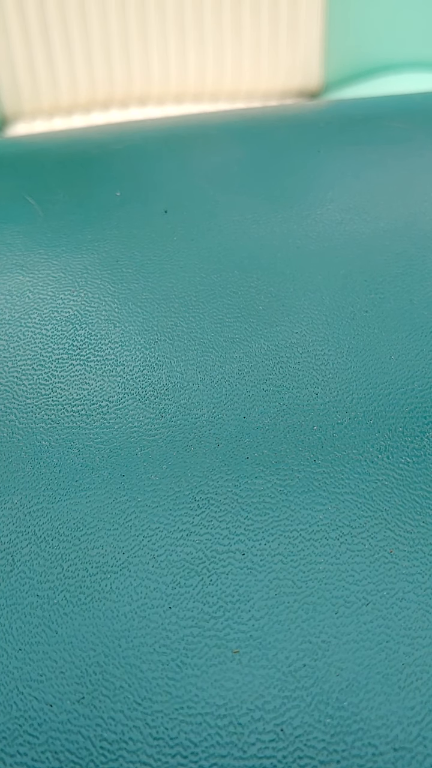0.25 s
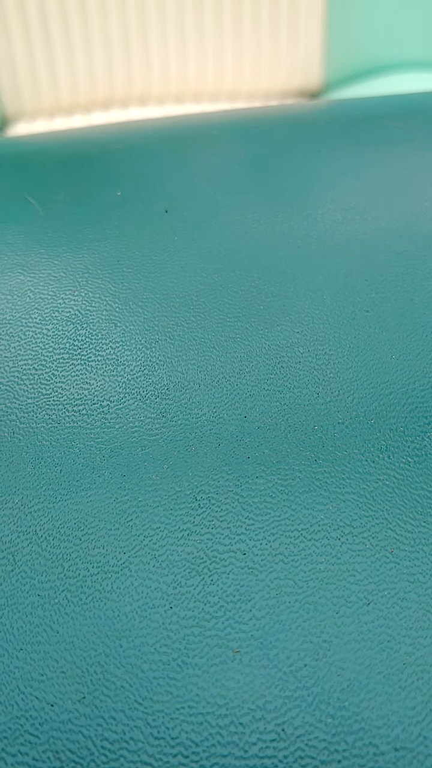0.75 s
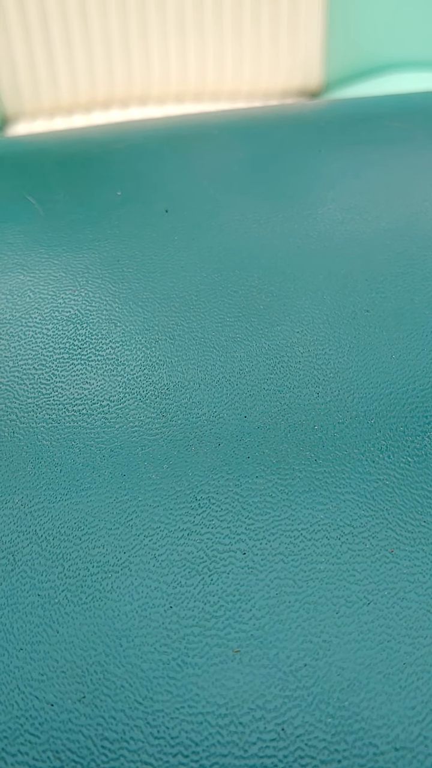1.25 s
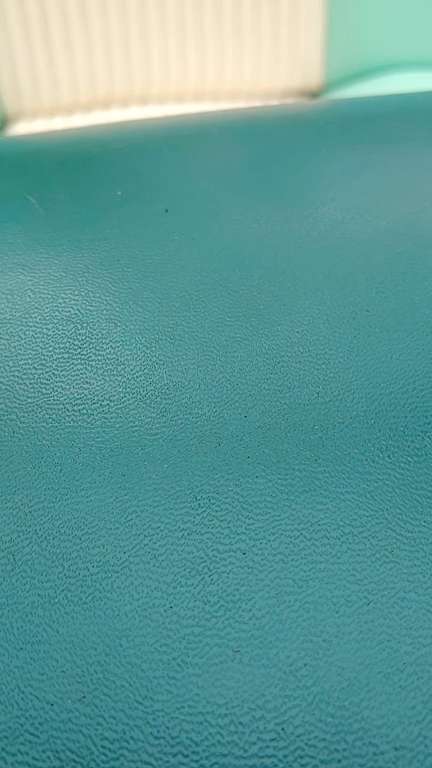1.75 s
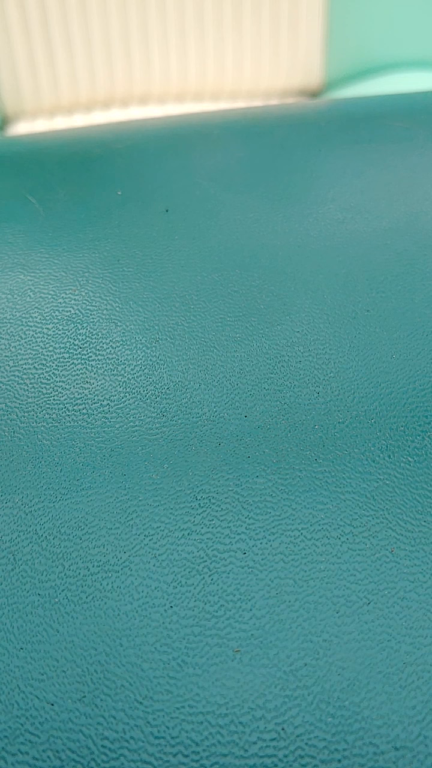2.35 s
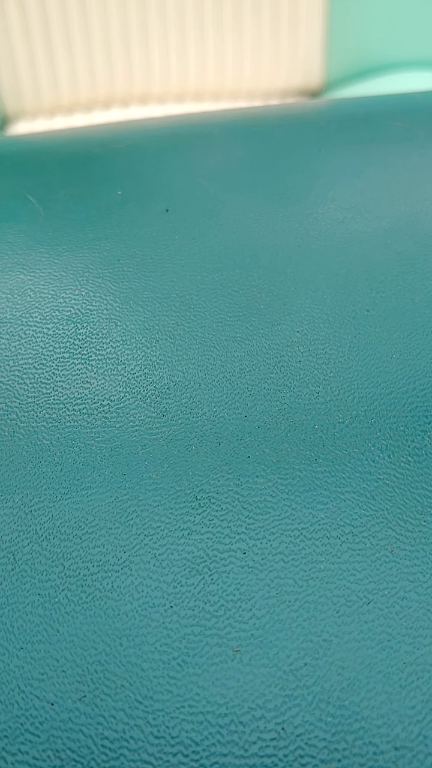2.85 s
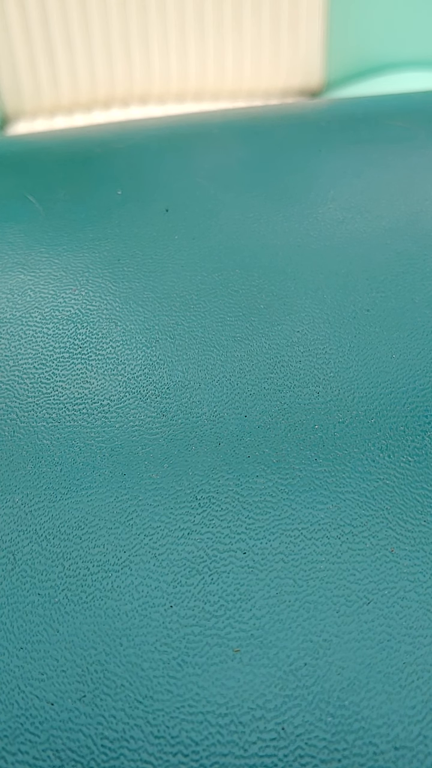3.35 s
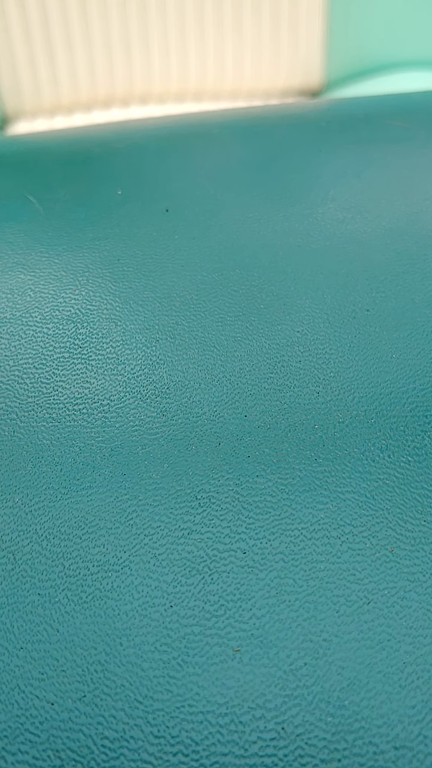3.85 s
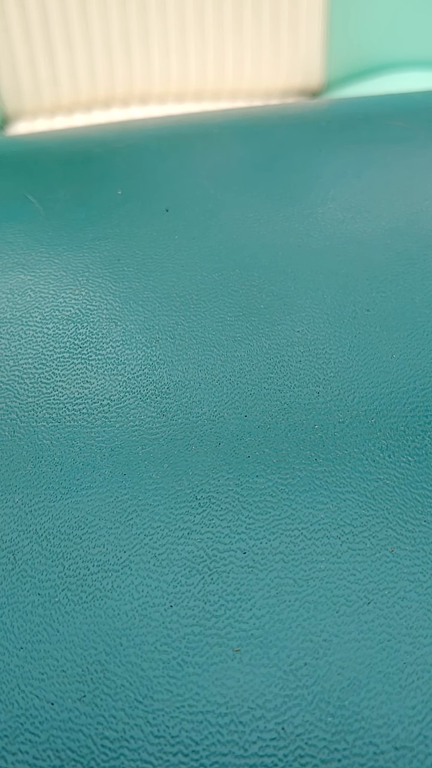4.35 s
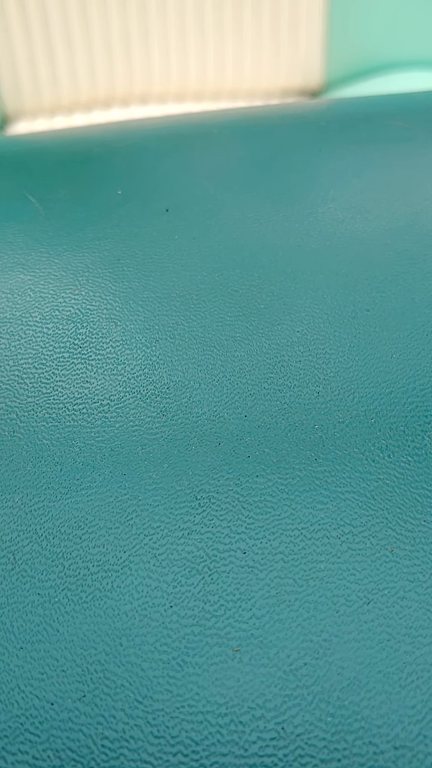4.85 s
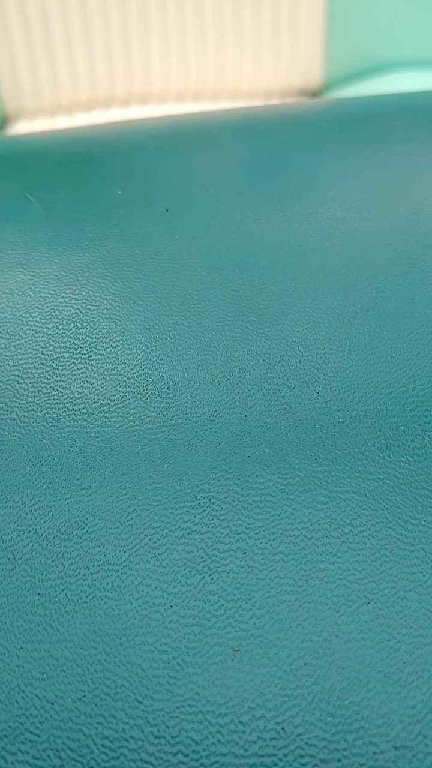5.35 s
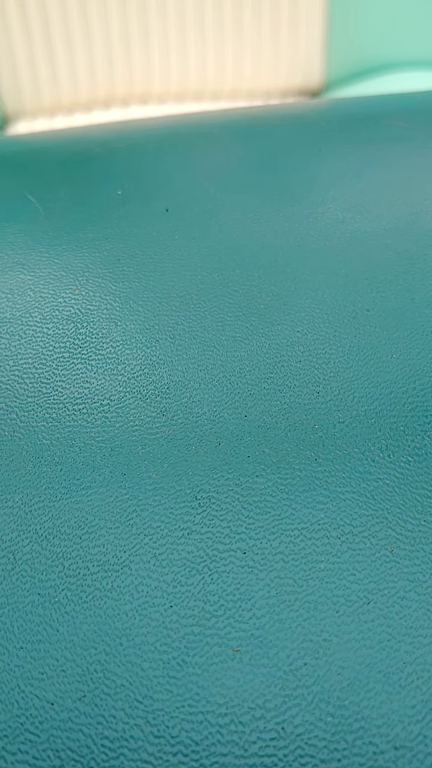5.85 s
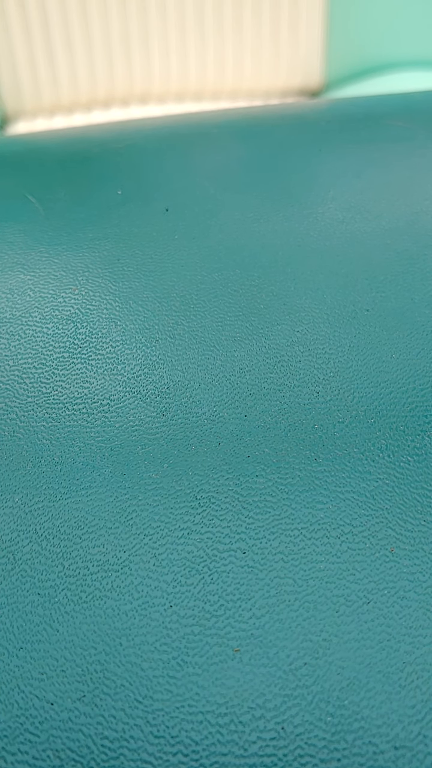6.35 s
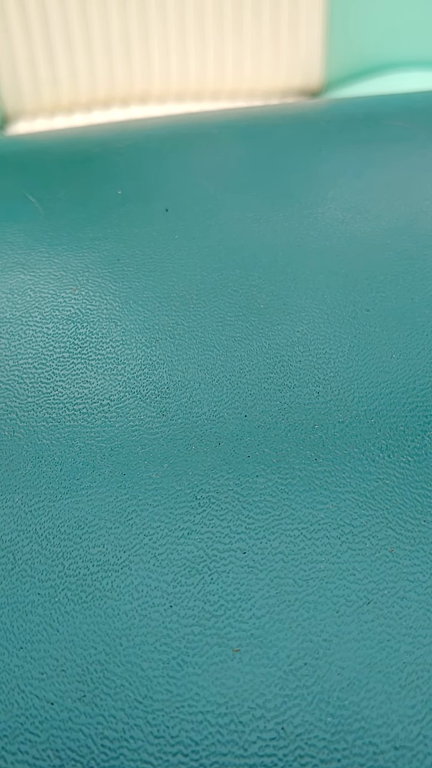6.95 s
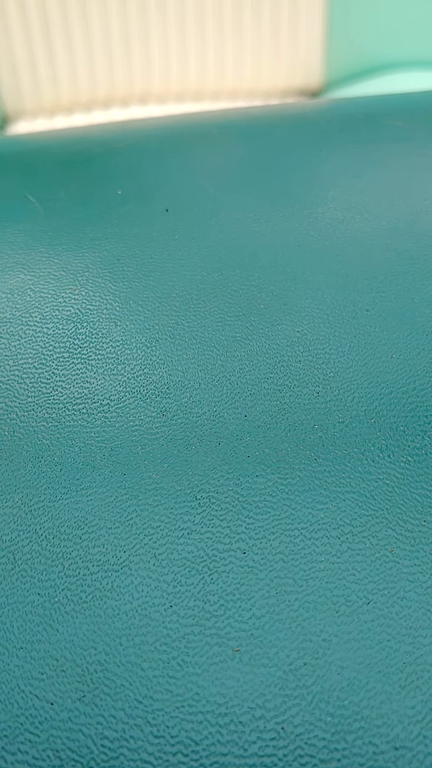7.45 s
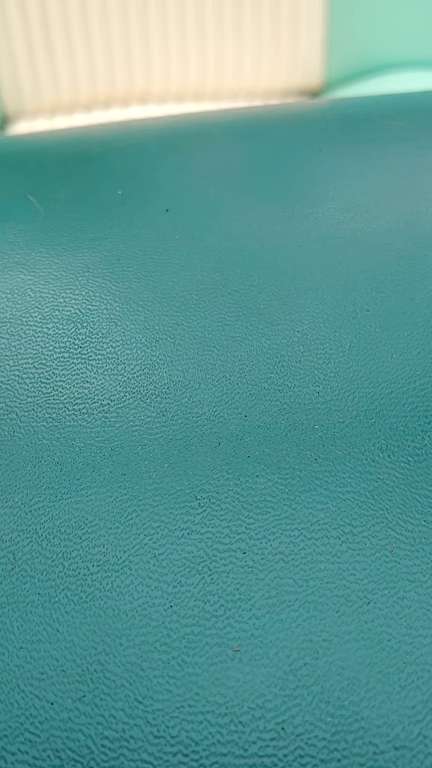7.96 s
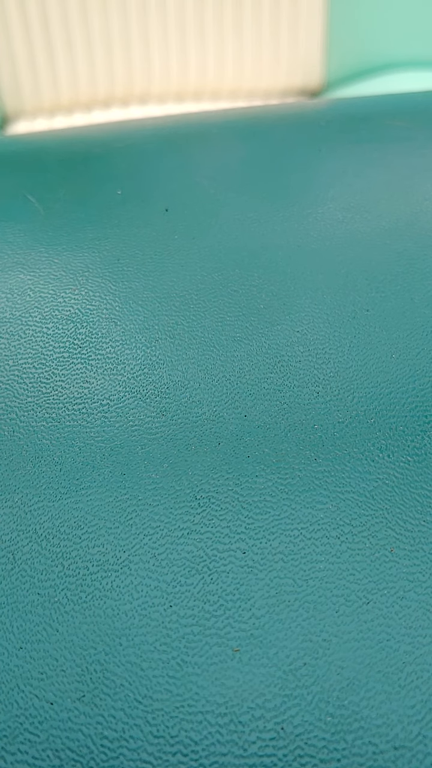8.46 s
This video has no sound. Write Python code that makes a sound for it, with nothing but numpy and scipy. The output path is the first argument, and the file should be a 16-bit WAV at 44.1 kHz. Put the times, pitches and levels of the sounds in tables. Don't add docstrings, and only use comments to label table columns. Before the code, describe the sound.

An old eight-cylinder engine idles steadily and a little lumpily up close, its valves ticking over a low hum and rushing fan air.

```python
import sys
import numpy as np
from scipy import signal
from scipy.fft import rfft, irfft, next_fast_len
from scipy.io import wavfile
from scipy.ndimage import uniform_filter1d

SR = 44100
rng = np.random.default_rng(int(sys.argv[2]) if len(sys.argv) > 2 else 0)


def int16_out(signal):
    q = np.round(np.clip(np.atleast_2d(signal).T, -1, 1) * 32767)
    wavfile.write(sys.argv[1], SR, q.astype(np.int16))


def voltage_ratio(level):
    return 10 ** (np.asarray(level, float) / 20)


N = 383669


def walk(rate_hz):
    hold = int(SR / rate_hz)
    steps = np.repeat(rng.standard_normal(N // hold + 1), hold)
    return 1.27 * uniform_filter1d(uniform_filter1d(steps, hold), hold)[:N]


def read_curve(rows, hz):
    row_hz, value = np.array(rows)[:, :2].T
    return np.interp(np.log(hz + 1), np.log(row_hz), value)


def spectrum_grid():
    size = next_fast_len(N)
    return size, np.arange(size // 2 + 1) * SR / size


def port_gains(db):
    return np.sqrt(2) * voltage_ratio(np.array(db))[:, None]


IDLE_TURNS_PER_S = 6.78
# time_s [s], lead_turns [camshaft turns]
HUNT = [(0, -.04), (.2, -.04), (.45, -.068), (.95, -.088), (1.4, -.136), (1.95, -.142), (2.35, -.123),
        (2.7, -.152), (3.2, -.145), (3.6, -.162), (4.45, -.136), (5.5, -.106), (5.95, -.106), (6.4, -.076),
        (7.2, -.077), (8.2, -.088), (8.7, -.107)]


def camshaft():
    time_s, lead_turns = np.transpose(HUNT)
    return time_s, IDLE_TURNS_PER_S * time_s + lead_turns


# multiple [per cam turn], left_db [dB], right_db [dB]
HUM = [(4, -48, -42), (8, -19, -21), (9, -33, -33), (10, -37, -37), (11, -29, -30), (13, -35, -40),
       (18, -36, -31), (20, -40, -41), (21, -45, -43), (24, -33, -31), (25, -40, -41), (26, -42, -43),
       (28, -40, -41), (31, -43, -40), (32, -32, -36), (40, -28, -36), (42, -32, -36), (56, -41, -40),
       (60, -42, -41), (62, -49, -49), (64, -54, -50), (76, -52, -49)]


def hum(cam_turns, lift_db, waver_db, slip):
    out = np.zeros((2, N))
    for multiple, *port_db in HUM:
        start_turns = rng.random() * (multiple % 8 > 0) + slip * walk(8) * multiple / 40
        tone = np.sin(2 * np.pi * (multiple * (cam_turns + 1 / 32) + start_turns))
        level = voltage_ratio(lift_db * multiple / 40 + waver_db * walk(8))
        out += port_gains(port_db) * level * tone
    return out


LIFTER_CLICKS, LIFTER_HZ, LIFTER_MS = 48, (700, 3500), (3, 8)
LIFTER_DB, LIFTER_DB_PER_OCTAVE = -25, -5
NEAR_BANK_DB, NEAR_BANK_TURNS = 2.5, .3


def lifters():
    click = np.arange(LIFTER_CLICKS)
    angle_turns = (click + .5) / LIFTER_CLICKS
    octaves = (click * .618 % 1) * np.log2(LIFTER_HZ[1] / LIFTER_HZ[0])
    ring_hz = LIFTER_HZ[0] * 2 ** octaves
    length_ms = LIFTER_MS[0] + (click * .414 % 1) * (LIFTER_MS[1] - LIFTER_MS[0])
    bank_db = NEAR_BANK_DB * octaves / 2 * np.cos(2 * np.pi * (angle_turns - NEAR_BANK_TURNS))
    right_db = LIFTER_DB + LIFTER_DB_PER_OCTAVE * octaves + bank_db
    return list(zip(angle_turns, ring_hz, length_ms, right_db))


# angle_turns [cam turns], ring_hz [Hz], length_ms [ms], right_db [dB]
TICKS = [(.017, 1680, 4, -24), (.023, 2280, 11, -29), (.063, 820, 5, -18), (.083, 1590, 7, -24),
         (.097, 1980, 3, -29), (.143, 900, 5, -24), (.17, 1980, 5, -28), (.203, 1080, 4, -27),
         (.263, 650, 3, -24), (.277, 2200, 8, -25), (.277, 2970, 9, -30), (.29, 900, 9, -26),
         (.29, 4010, 5, -29), (.317, 2110, 10, -23), (.343, 1510, 5, -26), (.383, 1850, 6, -26),
         (.463, 3700, 4, -30), (.477, 1980, 6, -19), (.53, 1640, 5, -22), (.57, 2110, 3, -27),
         (.583, 1590, 4, -27), (.65, 780, 6, -19), (.69, 820, 10, -22), (.743, 690, 4, -23),
         (.763, 860, 7, -24), (.817, 1680, 5, -25), (.883, 520, 4, -24), (.963, 1980, 4, -26),
         (.97, 1510, 3, -23), (.997, 820, 7, -21)]
# freq_hz [Hz], shade_db [dB]
TICK_SHADE = [(520, -2.5), (820, -6), (1080, -1), (1600, -7), (2100, -5), (2500, -2), (3000, -8),
              (4000, -8)]


def ticks(level_db, scatter_db, jitter_s, detune, apart_turns):
    time_s, turns = camshaft()
    t = np.arange(int(.04 * SR)) / SR
    out = np.zeros((2, N + len(t)))
    for angle_turns, ring_hz, length_ms, right_db in TICKS + lifters():
        port_db = right_db + read_curve(TICK_SHADE, ring_hz), right_db
        rise_s = length_ms / 1700
        shape = t / rise_s * np.exp(1 - t / rise_s)
        late, size, bend, start, skew = rng.standard_normal((60, 5)).T
        knock_s = np.interp(np.arange(60) + angle_turns, turns, time_s, right=-1)
        start_s = knock_s + jitter_s * late - 1.2 * rise_s
        extra_db = 12 / length_ms - length_ms / 6 + 1.8 * (ring_hz > 1450)
        gain = voltage_ratio(level_db + scatter_db * size + extra_db)
        for k in np.flatnonzero(start_s > 0):
            port_turns = np.array([[apart_turns * skew[k]], [0]])
            ring = np.sin(2 * np.pi * (ring_hz * (1 + detune * bend[k]) * t + start[k] + port_turns))
            i = int(start_s[k] * SR)
            out[:, i:i + len(t)] += gain[k] * port_gains(port_db) * shape * ring
    return out[:, :N]


# freq_hz [Hz], level_db [dB per Hz]
RUMBLE = [
    [(20, -63), (40, -53), (56, -49.5), (100, -42), (145, -52.5), (230, -49.5), (272, -41.5), (311, -45), (440, -55), (549, -51.5), (596, -52), (780, -48), (900, -60), (1145, -56.5)],
    [(20, -64), (40, -61), (56, -47), (105, -42), (150, -50), (237, -50.5), (283, -44.5), (325, -51.5), (366, -48.5), (454, -52.5), (589, -48), (780, -47), (960, -54.5), (1145, -60)],
]
# freq_hz [Hz], level_db [dB per Hz]
FAN = [
    [(1152, -57.7), (1342, -60), (1945, -55.5), (2718, -61.5), (2840, -68.5), (2996, -71), (3173, -67.5), (3335, -61), (3545, -72.5), (3993, -58), (4291, -59.5), (5498, -73), (5898, -67.5)],
    [(1152, -57.0), (1722, -48), (2074, -56), (2684, -64), (3437, -56.5), (3579, -55), (3742, -58.5), (3891, -55), (4312, -52.5), (4773, -54.5), (4956, -59), (5295, -58.5), (5898, -72)],
]
# freq_hz [Hz], level_db [dB per Hz]
HISS = [
    [(5905, -71.3), (6725, -71.5), (7410, -82.5), (8007, -86.5), (8691, -80), (9400, -97), (10305, -82.5), (11146, -86), (12298, -99)],
    [(5905, -71.0), (6569, -80.5), (7410, -89), (7702, -81.5), (8102, -88), (8705, -82.5), (9681, -94), (10502, -100), (12298, -110)],
]
# freq_hz [Hz], share [0-1]
ALIKE = [(40, 1), (120, 0.7), (180, 0.86), (260, 0.68), (600, 0.98), (1100, 0.66), (1950, 0.77),
         (2100, 0.6), (2650, 0.4), (3100, 0.35), (6000, 0.51), (9300, 0.04)]
# freq_hz [Hz], width_hz [Hz], peak_db [dB]
BAY = [(1860, 90, 2), (3020, 60, 3), (4220, 60, 2.5), (2230, 40, 4), (3310, 60, 5), (3520, 80, 4),
       (3920, 60, 4), (4380, 70, 4), (4750, 80, 3)]
# delay_ms [ms], share [signed ratio]
ECHOES = [
    [(2.9, 0.1), (4., 0.072), (6.5, 0.058), (10., 0.051)],
    [(5.4, 0.1), (6.5, .06), (10.2, 0.049), (11., 0.031)],
]
SAG_FROM_S, SAG_DB_PER_S = 8.17, -3


def rush_colour(hz):
    db = np.array([read_curve(low + mid[1:] + top[1:], hz) for low, mid, top in zip(RUMBLE, FAN, HISS)])
    metal_db = 0
    for freq_hz, width_hz, peak_db in BAY:
        metal_db = metal_db + peak_db / (1 + ((hz - freq_hz) / width_hz * 2) ** 2)
    return db + np.array([[.3], [1]]) * metal_db


def bay_echo(hz, port):
    bounce = sum(share * np.exp(-2j * np.pi * hz * delay_ms / 1000) for delay_ms, share in port)
    return 1 + bounce * (hz > 900)


def rush(cam_turns, swell_db, flicker_db, throb_db):
    size, hz = spectrum_grid()
    same, other = rfft(rng.standard_normal((2, size)))
    share = np.clip(read_curve(ALIKE, hz), 0, 1)
    air = np.array([same, share * same + np.sqrt(1 - share ** 2) * other])
    air = air * voltage_ratio(rush_colour(hz)) * np.sqrt(SR / 2)
    air = air * np.array([bay_echo(hz, port) for port in ECHOES])
    sag_db = SAG_DB_PER_S * np.clip(np.arange(N) / SR - SAG_FROM_S, 0, None)
    throb = throb_db * np.cos(2 * np.pi * (cam_turns - .42))
    swell = swell_db * walk(3)
    octave = np.clip(np.log2(hz / 20 + 1e-9), 0, 10)
    out = np.zeros((2, N))
    for k in range(11):
        band = np.clip(1 - np.abs(octave - k), 0, 1)
        part = irfft(air * band, size)[:, :N]
        upper_db = sag_db * (k > 6) + throb * ((k > 6) + 2 * (k == 7))
        out += part * voltage_ratio(swell + flicker_db * walk(12) + upper_db)
    return out


# multiple [per cam turn], left_db [dB], right_db [dB]
WHINES = [
    (81, -39, -36),
    (113, -36, -33),
    (121, -44, -40),
]


def whines(cam_turns, slip_hz, waver_db):
    out = np.zeros((2, N))
    for multiple, *port_db in WHINES:
        slip_turns = slip_hz * np.cumsum(walk(9)) / SR
        tone = np.sin(2 * np.pi * (multiple * cam_turns + slip_turns))
        out += port_gains(port_db) * voltage_ratio(waver_db * walk(16)) * tone
    return out


# freq_hz [Hz], lag_ms [ms]
LAG = [(60, .2), (300, .4), (1900, .452), (2060, .4), (2200, .27), (2600, .33), (3500, .295), (5000, .287)]


def delay_left(x):
    size, hz = spectrum_grid()
    turn_back = np.exp(-2j * np.pi * hz * read_curve(LAG, hz) / 1000)
    return irfft(rfft(x, size) * turn_back, size)[:N]


def scene():
    cam_turns = np.interp(np.arange(N) / SR, *camshaft())
    out = hum(cam_turns, lift_db=2.5, waver_db=1.8, slip=.04)
    out += ticks(level_db=-2, scatter_db=.7, jitter_s=.0004, detune=.006, apart_turns=.1)
    out += rush(cam_turns, swell_db=.1, flicker_db=.4, throb_db=.25)
    out += voltage_ratio(2.5) * whines(cam_turns, slip_hz=3.5, waver_db=2.5)
    out[0] = delay_left(out[0])
    return out


def roll_off(x):
    return signal.sosfilt(signal.butter(12, 12300, fs=SR, output="sos"), x)


def record(dry):
    rounded = np.tanh(.6 * dry) / .6
    return roll_off(rounded)


dry = scene()
out = record(dry)
int16_out(out)
```